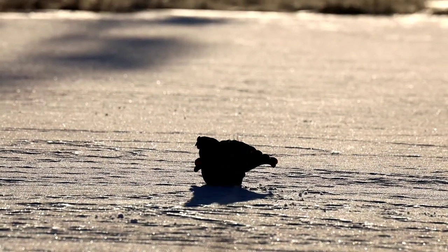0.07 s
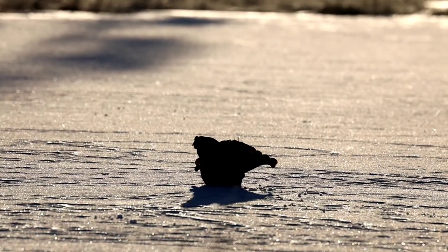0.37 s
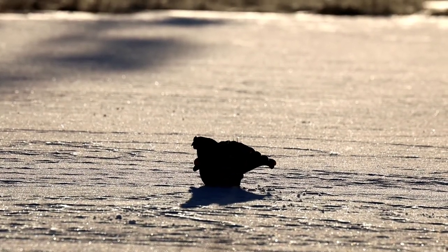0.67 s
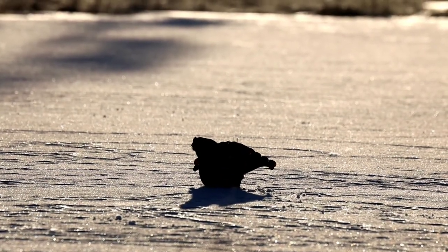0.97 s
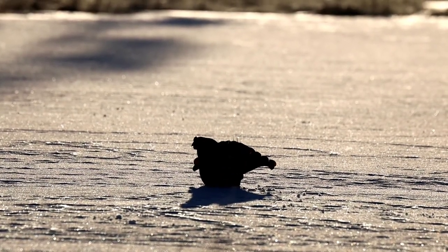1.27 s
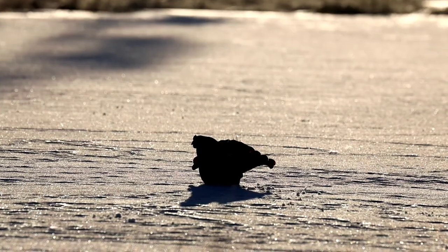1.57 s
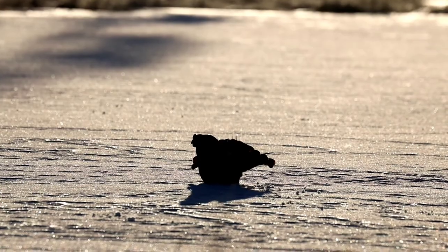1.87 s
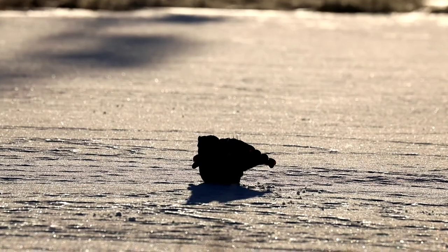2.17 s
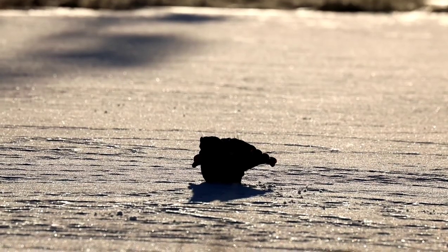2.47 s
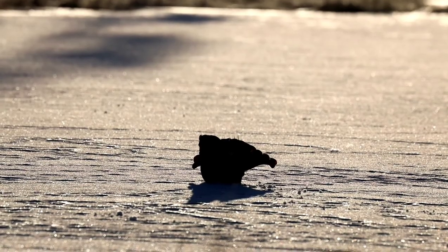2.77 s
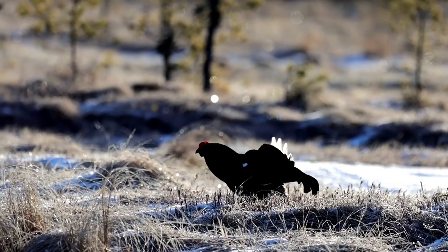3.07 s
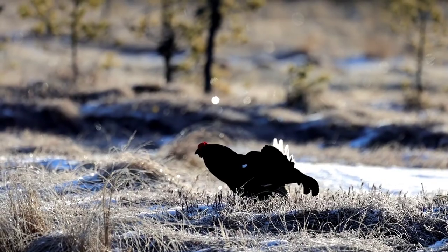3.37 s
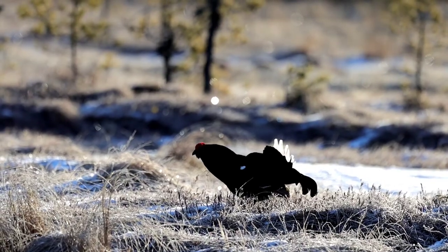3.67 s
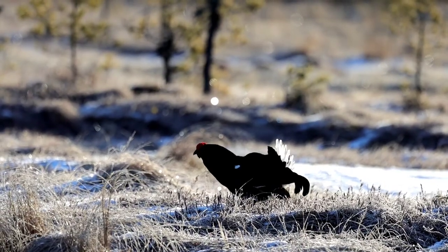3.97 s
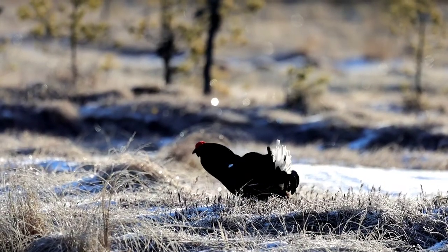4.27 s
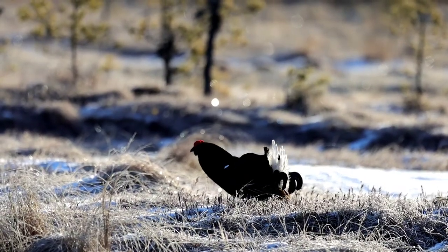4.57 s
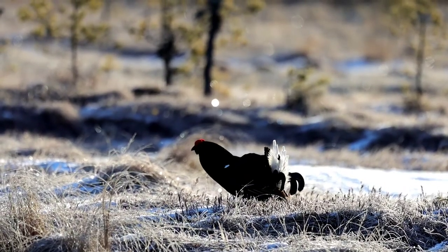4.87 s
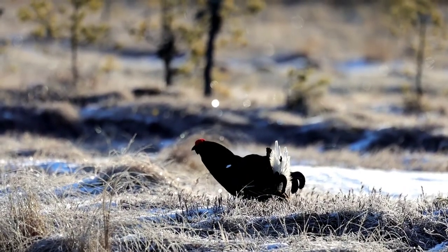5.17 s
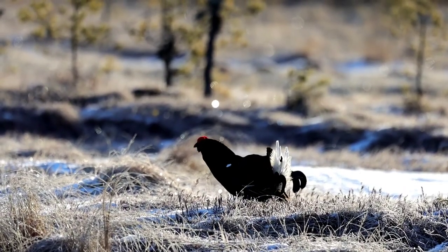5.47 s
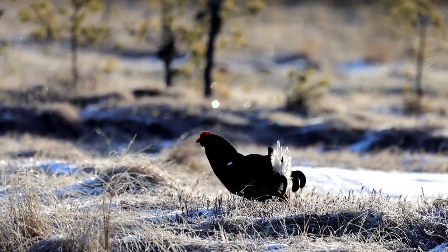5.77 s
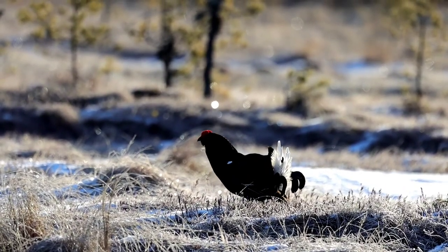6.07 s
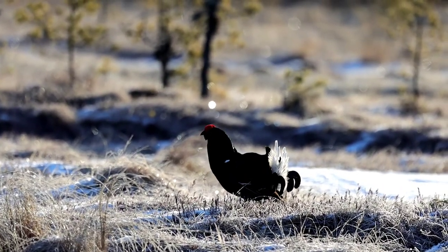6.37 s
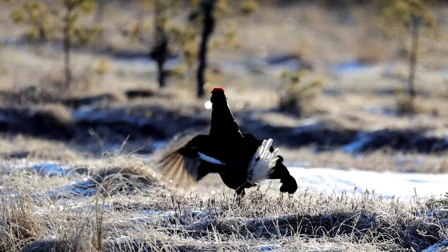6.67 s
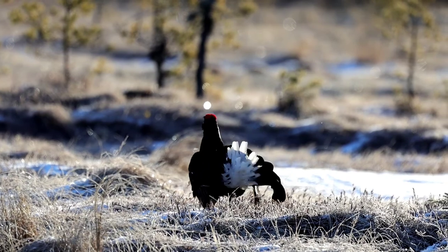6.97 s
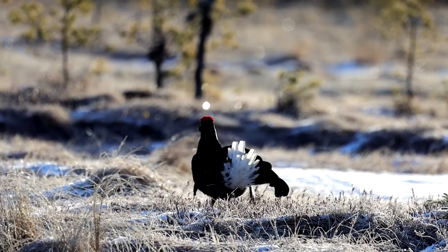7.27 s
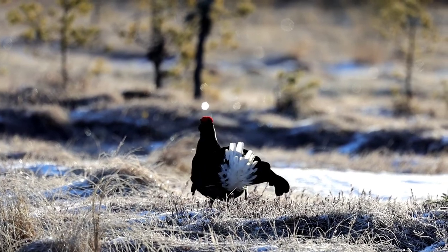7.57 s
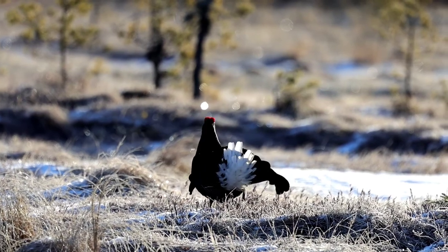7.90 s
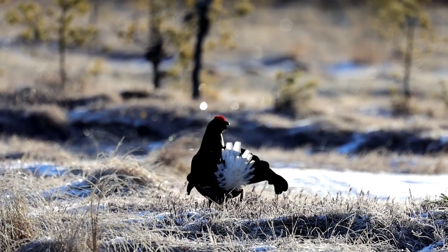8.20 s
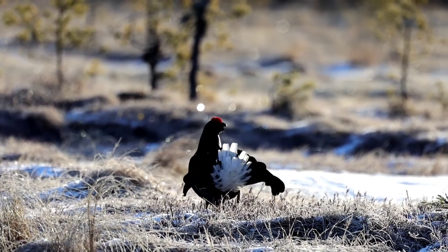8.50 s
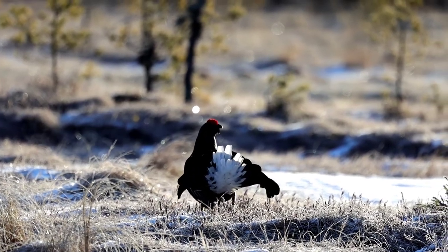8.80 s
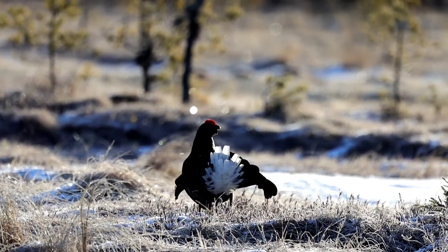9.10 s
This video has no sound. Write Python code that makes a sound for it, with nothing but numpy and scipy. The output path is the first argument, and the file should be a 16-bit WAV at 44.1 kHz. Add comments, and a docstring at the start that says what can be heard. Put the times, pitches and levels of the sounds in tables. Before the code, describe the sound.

A black grouse bubbles and coos outdoors, then flutters its wings and gives a harsh hiss, with faint small birds behind.

```python
"""A black grouse cock bubbling on a frozen bog, on a pair of microphones. His short, pure coos glide
through the resonance of his swollen throat sac; near the end he jumps with a flutter and gives a harsh
two-part hiss. Further off, rivals coo and hiss, and small birds chip, whistle and twitter. For three
seconds we stand by crackling ice, the air almost mono; then out on the bog, the air quieter and wide."""
import sys
import numpy as np
from scipy import signal
from scipy.fft import rfft, irfft, next_fast_len
from scipy.io import wavfile
from scipy.ndimage import uniform_filter1d

SR = 44100
rng = np.random.default_rng(int(sys.argv[2]) if len(sys.argv) > 2 else 0)


def waveform_to_disk(signal):
    """Save audio, clipped to [-1, 1], as 16-bit WAV at the path in sys.argv[1]."""
    frames = np.transpose(np.atleast_2d(signal))
    scaled = np.clip(frames, -1, 1) * 32767
    samples = np.round(scaled).astype(np.int16)
    wavfile.write(sys.argv[1], SR, samples)


N = 411894
TIME = np.arange(N) / SR
SAC_HZ, SAC_WIDTH_HZ = 545, 66  # resonance of the throat sac


def grouse_coos():
    """The near cock's even runs and hooked coos, then fainter ones, some from far rivals."""
    # runs: t/s, coos, period/s, first top/Hz, last top/Hz, lateness of the pitch change (power),
    # first drive/dB, last drive/dB
    runs = [(0.5553, 6, .0721, 467, 538.6, 0.54, -28.5, -22.8),
            (1.2058, 11, .0719, 511, 656, 2.72, -25.4, -19.5), (3.1296, 5, 0.071, 522, 562, 4, -33, -31),
            (5.3777, 3, .0712, 460, 498, 0.55, -34.5, -42), (7.5704, 4, 0.075, 539, 624, 1.3, -46, -43.5),
            (8.618, 3, .071, 506, 489.6, 1, -36, -49)]
    # hooked coos: t/s, length/s, top/Hz, rise/Hz, crest (share of length), drive/dB
    hooks = [(0.044, 0.02, 613, 37, 0.2, -19.5), (0.116, 0.062, 623, 10, 0.7, -18.5),
             (0.198, 0.055, 593, 158, 0.66, -23.5), (0.243, 0.082, 664, 148, 0.45, -25.5),
             (0.494, 0.042, 618, 10, 0.068, -26), (0.989, 0.025, 523, -2, 0.36, -25.5),
             (1.144, 0.042, 582, 5, 0.02, -25), (1.99, 0.06, 698, 163, 0.26, -20),
             (2.065, 0.042, 705, 208, 0.18, -20), (2.257, 0.031, 689, 132, 0.27, -34),
             (2.321, 0.074, 642, 52, 0.46, -22), (2.459, 0.029, 672, 152, 0.28, -18.5),
             (2.567, 0.07, 678, 254, 0.49, -20), (2.651, 0.066, 562, 84, 0.51, -22.5),
             (2.729, 0.056, 655, 260, 0.67, -20), (2.781, 0.13, 676, 88, 0.46, -20),
             (2.997, 0.021, 574, 29, 0.56, -20), (3.017, 0.06, 533, 20, 0.5, -29.5),
             (3.5, 0.052, 587, 36, 0.28, -25), (3.571, 0.044, 621, 28, 0.59, -23),
             (3.643, 0.035, 637, 49, 0.51, -23.5), (3.915, 0.066, 629, 92, 0.47, -27),
             (4.051, 0.026, 638, 76, 0.49, -22.5), (4.149, 0.071, 622, 212, 0.67, -28),
             (4.244, 0.063, 511, 18, 0.54, -27.5), (4.325, 0.067, 643.5, 242, 0.61, -27.5),
             (4.365, 0.13, 612, 59.5, 0.66, -31), (4.583, 0.069, 518, 0, 0.23, -35),
             (4.673, 0.059, 667, 262, 0.52, -26.5), (4.778, 0.018, 605, 47, 0.51, -25),
             (4.852, 0.066, 569, -2, 0.39, -30), (4.913, 0.072, 554, 189, 0.73, -31.5),
             (4.993, 0.065, 656, 146, 0.42, -27.5), (5.079, 0.068, 559, 50, 0.47, -43.5),
             (5.168, 0.05, 600, 50, 0.45, -43.5), (5.243, 0.046, 576, 5, 0.033, -31.5),
             (5.292, 0.048, 561, 50, 0.22, -43.5), (5.785, 0.033, 512, 36, 0.57, -40),
             (5.834, 0.093, 460, 14, 0.61, -33), (5.882, 0.073, 495, 46, 0.37, -37),
             (6.291, 0.029, 585, 30, 0.37, -45), (6.337, 0.0255, 620, 30, 0.4, -45.5),
             (6.397, 0.023, 595, 20, 0.22, -48), (6.472, 0.063, 610, 65, 0.46, -45.5),
             (6.568, 0.05, 624, 30, 0.085, -32.5), (6.657, 0.029, 607, 103, 0.14, -42.5),
             (6.876, 0.059, 545, 12, 0.32, -44), (7.874, 0.057, 612, 214, 0.23, -43.5),
             (8.238, 0.034, 600, 63, 0.088, -45), (8.484, 0.029, 590, 88, 0.16, -43),
             (8.527, 0.078, 520, 55, 0.47, -39.5), (8.748, 0.045, 519, 140, 0.61, -45),
             (8.994, 0.041, 586, 1, 0.01, -44), (9.05, 0.076, 508, 5, 0.55, -43),
             (9.204, 0.072, 562, 60, 0.45, -46), (9.303, 0.029, 604, 50, 0.3, -39)]
    out = np.zeros(N)
    for start, count, period, first_hz, last_hz, lateness, first_db, last_db in runs:
        for k, progress in enumerate(np.linspace(0, 1, count)):
            top_hz = first_hz + (last_hz - first_hz) * progress ** lateness
            db = first_db + (last_db - first_db) * progress
            add(out, start + k * period, run_coo(.058, top_hz, db))
    for start, *hook in hooks:
        add(out, start, coo(*hook, fall=.317))
    return out


def run_coo(length, top_hz, db, sac_width_hz=SAC_WIDTH_HZ):
    """One coo of a run: a low one just falls; pushed above 468 Hz, it arches more and more."""
    crest = np.clip((top_hz - 468) / 570, 0, .5)
    return coo(length, top_hz, 110 * crest, crest, db, fall=.203, sac_width_hz=sac_width_hz)


def coo(length, top_hz, rise_hz, crest, db, fall, sac_width_hz=SAC_WIDTH_HZ):
    """A near-pure tone that crests, then loses the share `fall` of its pitch; loudest near the sac's."""
    attack_s, release_s, swell_db = .00663, .0082, 6.5
    t = np.arange(int(length * SR)) / SR
    progress, crest = t / length, np.clip(crest, .01, .9)
    before = np.maximum(1 - progress / crest, 0)
    after = np.maximum((progress - crest) / (1 - crest), 0)
    hz = top_hz - rise_hz * before ** 1.38 - fall * top_hz * after ** (1 + 2.74 * crest)
    detune = (hz / SAC_HZ - SAC_HZ / hz) * SAC_HZ / sac_width_hz
    gate = np.clip(t / attack_s, 0, 1) * np.clip((length - t) / release_s, 0, 1)
    drive = gate * undb(db + swell_db * (progress - .5)) * (1 + .05 * walk(200, len(t)))
    phase = 2 * np.pi * np.cumsum(hz) / SR
    tone = np.sin(phase) + undb(-52) * np.sin(2 * phase)
    return np.sqrt(2) * drive / np.hypot(1, detune) * tone


def hiss(main_width_hz=200):
    """The cock forces rasping air through one gliding resonance and the steady ones of his windpipe."""
    # a short syllable, then a long one: t/s, level/dB, main resonance/Hz
    syllables = [(6.825, -71, 1446), (6.84, -47.5, 1388), (6.875, -38.5, 1352), (6.94, -46, 1288),
                 (7.05, -59.5, 1248), (7.2, -50, 1271), (7.42, -44.5, 1354), (7.55, -46, 1360),
                 (7.67, -55.5, 1586), (7.735, -78, 1600)]
    # windpipe resonances: f/Hz, width/Hz, spectral level against the main one/dB
    windpipe = [(1246, 120, -6.5), (1590, 210, -4), (2170, 660, -20), (3600, 990, -28), (6800, 1700, -29)]
    jet = rng.standard_normal(N) * np.exp(.04 * walk(130))
    centre_hz = uniform_filter1d(curve(syllables, column=2), SR // 20)
    band = signal.sosfilt(signal.butter(3, main_width_hz / 2, fs=SR, output="sos"), jet)
    rasp = unit(band * np.cos(2 * np.pi * np.cumsum(centre_hz) / SR))
    for hz, width_hz, db in windpipe:
        rasp += undb(db) * np.sqrt(width_hz / main_width_hz) * unit(resonate(jet, hz, width_hz))
    blowing = (TIME > syllables[0][0]) & (TIME < syllables[-1][0])
    gate = uniform_filter1d(blowing.astype(float), SR // 100)
    return unit(rasp) * gate * undb(curve(syllables))


def rivals():
    """Two cocks across the bog: one bubbles evenly, the other in higher, clipped notes."""
    # both together at the microphones: t/s, level/dB
    levels = [(0, -45), (1.1, -50.5), (2.2, -53.5), (2.8, -49), (3.1, -40.5), (3.5, -48.5), (4.6, -50),
              (5.2, -55), (6.1, -51.5), (6.4, -56.5), (6.75, -57), (7.3, -52.5), (7.7, -54.5),
              (8.35, -54.5), (8.7, -54.5), (9, -48.5), (9.34, -49)]
    # the clipped rival against the even one: t/s, level/dB
    balance = [(0, -5), (5.8, -4), (6.05, 6), (6.7, 6), (6.9, -4.5), (9.34, -3)]
    even = rival(period_s=.073, centre_hz=509.8, held_share=.763, looseness=.12, wander_hz=13.5)
    clipped = rival(period_s=.07, centre_hz=591.4, held_share=.42, looseness=.25, wander_hz=28)
    lead = undb(curve(balance))
    return (even + lead * clipped) / np.hypot(1, lead) * undb(curve(levels))


def rival(period_s, centre_hz, held_share, looseness, wander_hz, uneven_db=2):
    """A far cock and his echo: an unbroken run of coos whose pitch wanders."""
    out, drift, offset = np.zeros(N), walk(2.2), rng.random()
    for k, (late, high, loud, held) in enumerate(rng.standard_normal((140, 4))):
        start = (k + offset + looseness * late) * period_s
        hz = centre_hz + wander_hz * (drift[int(np.clip(start * SR, 0, N - 1))] + .5 * high)
        length = period_s * held_share * (1 + .35 * np.tanh(held))
        add(out, start, undb(uneven_db * loud) * unit(run_coo(length, hz, db=0, sac_width_hz=190)))
    return unit(out + undb(-11) * scatter(out, t60=.69))


def far_hisses():
    """Other grouse hiss far off; only their main resonance carries."""
    # hisses: t/s, length/s, level/dB
    calls = [(.2, .25, -53.5), (1.28, 0.24, -59.5), (2.28, 0.34, -56.5)]
    swell = sum(undb(db) * np.sin(np.pi * np.clip((TIME - start) / length, 0, 1))
                for start, length, db in calls)
    return swell * unit(resonate(rng.standard_normal(N), hz=1640, width_hz=570))


def ice_cracks():
    """Single cracks in the ice: a bright snap over a dull push and pull."""
    # cracks: t/s, snap/dB, thud/dB (both before filtering and mixing), decay/s
    cracks = [(0.023, -17, -49, 0.0011), (0.0258, -16, -27, 0.0016), (0.0555, -12, -20.5, 0.0015),
              (0.151, -24, -50, 0.00085), (.1545, -23.5, -51, 0.0034), (0.157, -21.5, -13.5, 0.00058),
              (0.227, -39, -56, .001), (0.568, -44.5, -55, 0.0089), (1.418, -31, -37, 0.0018),
              (1.425, -29, -27, 0.0024), (1.788, -37.5, -50, 0.0016), (2.381, -36, -33.5, 0.0017)]
    # spectra of snap and thud: f/Hz, level/dB
    snap_spectrum = [(250, 6), (800, 10), (1800, 8.5), (2800, -3.5), (4200, 2.5), (7000, -12), (15000, -12)]
    thud_spectrum = [(70, -12), (170, 3.5), (500, 6), (900, -1), (1600, -14), (4000, -45)]
    snaps, thuds = np.zeros((2, N))
    t = np.arange(SR // 20) / SR
    for start, snap_db, thud_db, decay in cracks:
        add(snaps, start, undb(snap_db) * np.exp(-t / decay) * rng.standard_normal(len(t)))
        swing = 2 * t / decay - 2
        add(thuds, start - decay / 2, -undb(thud_db) * swing * np.exp(-swing ** 2))
    return colour(snaps, snap_spectrum) + undb(-5) * colour(thuds, thud_spectrum)


def rustle(grain_db=5):
    """Grainy rustle in fading bursts: frost crunch at the start, wing flutter as the cock jumps."""
    # bursts: t/s, attack/s, level/dB, fading/(dB/s)
    bursts = [(0, 0.0024, -30, 92), (.2, 0.068, -55, 30), (6.82, .05, -62, 66)]
    # spectrum of the grains: f/Hz, level/dB
    spectrum = [(120, 0.5), (600, 0), (1100, -1), (1900, 1), (2900, -2.5), (4300, -4), (6500, -12),
                (15000, -18)]
    grains = rng.standard_normal(N) * undb(grain_db * np.minimum(rng.exponential(size=N), 5))
    envelope = np.zeros(N)
    for start, attack, db, fading in bursts:
        since = TIME - start
        envelope += np.clip(since / attack, 0, 1) * undb(db - fading * np.maximum(since - attack, 0))
    return unit(colour(grains, spectrum)) * envelope


def small_birds():
    """Quick downward chips and gliding whistles, heard direct and off the ground."""
    # one bird's chips: t/s, level at the bird/dB
    chips = [(2.026, -51.5), (2.152, -51), (2.274, -43.5), (2.381, -43), (2.502, -41.5), (2.625, -41),
             (2.749, -42.5), (2.877, -40)]
    # other birds' whistles: t/s, length/s, start/Hz, end/Hz, level at the bird/dB
    whistles = [(3.032, .036, 2940, 4300, -50), (3.784, 0.2, 4830, 3900, -62.5),
                (5.053, 0.2, 5020, 3920, -56.5), (5.537, 0.12, 2060, 1850, -70),
                (5.857, 0.091, 2030, 1860, -69.5), (5.948, .08, 1880, 2080, -73),
                (6.664, .42, 4810, 3260, -65.5), (8.903, 0.19, 4630, 4000, -69),
                (9.121, .1, 3870, 3540, -66)]
    direct = np.zeros(N)
    for start, db in chips:
        add(direct, start, glide(.027, start_hz=4370, end_hz=2510, db=db))
    for start, *whistle in whistles:
        add(direct, start, glide(*whistle))
    # the ground bounce arrives just behind and hollows the glides near 3.1 kHz
    return .55 * direct + .45 * np.roll(direct, 21)


def glide(length, start_hz, end_hz, db, waver=.0067, flutter_db=2):
    """A small bird's pure note that slides evenly, wavering a little."""
    size = int(length * SR)
    hz = np.geomspace(start_hz, end_hz, size) * (1 + waver * walk(82.5, size))
    shape = np.sin(np.pi * np.linspace(0, 1, size) ** .8)
    envelope = shape * undb(db + flutter_db * walk(61, size))
    return np.sqrt(2) * envelope * np.sin(2 * np.pi * np.cumsum(hz) / SR)


def twitter(start_s=4.268, period_s=.1525, ramp_s=.046):
    """A far songbird's even string of eight buzzy notes, loudest in the middle."""
    envelope = np.zeros(N)
    for k, off_middle in enumerate(np.linspace(-1, 1, 8)):
        since = TIME - start_s - k * period_s
        envelope += undb(-65 - 7 * off_middle ** 2) * np.maximum(1 - np.abs(since) / ramp_s, 0)
    return envelope * unit(resonate(rng.standard_normal(N), hz=3250, width_hz=600))


def open_air(on_bog):
    """The air bed: almost mono over the ice, wide over the bog."""
    # spectra of the air in each place: f/Hz, level/dB
    ice_spectrum = [(25, -22), (60, -3), (170, 0.5), (330, 0), (700, 0), (1100, -8.5), (1650, -10),
                    (2100, -14.5), (3200, -13.5), (4000, -18.5), (4900, -16), (5700, -22.5), (9000, -24),
                    (15500, -27.5)]
    bog_spectrum = [(25, -21), (60, -10), (140, -1), (260, -4), (400, -1), (700, -3), (1100, -11.5),
                    (1600, -12.5), (2100, -17), (3200, -15.5), (4000, -19), (4900, -16.5), (5700, -23),
                    (9000, -24), (15500, -27.5)]
    # loudness of the air: t/s, level/dB
    levels = [(0, -52), (2.15, -48), (3.0, -46.5), (3.15, -59), (9.34, -59.5)]
    bed = (1 - on_bog) * air(ice_spectrum, side_db=-37) + on_bog * air(bog_spectrum, side_db=.5)
    return bed * undb(curve(levels))


def air(spectrum, side_db, stir_db=1.26):
    """Far-off rumble that stirs slowly, under an even, wider hiss; built as mid and side."""
    mid, side = (colour(rng.standard_normal(N), spectrum) for _ in range(2))
    lows = signal.butter(1, 1000, fs=SR, output="sos")
    mid = mid + signal.sosfilt(lows, mid) * (undb(stir_db * walk(6)) - 1)
    side = side - .5 * signal.sosfilt(lows, side)
    return mid + undb(side_db) * np.array([side, -side])


def whine():
    """A faint, steady high tone and its octave."""
    # partials: f/Hz, level/dB
    partials = [(2444, -78), (4888, -84.5)]
    return sum(np.sqrt(2) * undb(db + .5 * walk(1.5)) * np.sin(2 * np.pi * hz * TIME)
               for hz, db in partials)


def scatter(x, t60):
    """Diffuse echo from trees and hummocks, dying by 60 dB in t60 seconds."""
    t = np.arange(SR // 2) / SR
    tail = rng.standard_normal(len(t)) * undb(-60 * t / t60) * np.clip(t / .03, 0, 1)
    return signal.oaconvolve(x, tail / np.linalg.norm(tail))[:N]


def place(x, pan_db, lag):
    """Two microphones: pan is left minus right, lag the samples by which the left hears it later."""
    at = np.arange(N)
    left = np.interp(at - lag / 2, at, x) * undb(pan_db / 2)
    right = np.interp(at + lag / 2, at, x) * undb(-pan_db / 2)
    return np.array([left, right])


def resonate(x, hz, width_hz):
    """A resonance applied twice, for steep skirts."""
    b, a = signal.iirpeak(hz, hz / width_hz, SR)
    return signal.lfilter(b, a, signal.lfilter(b, a, x))


def colour(x, spectrum):
    """Filter by a spectrum that falls away below its first point; white noise keeps its power."""
    size = next_fast_len(len(x))
    hz, db = np.transpose(spectrum)
    bins = np.arange(size // 2 + 1) * SR / size + 1
    gain = undb(np.interp(np.log(bins), np.log(hz), db)) * np.minimum(bins / hz[0], 1)
    return irfft(rfft(x, size) * unit(gain), size)[:len(x)]


def walk(rate_hz, size=N):
    """Smooth random drift with a spread near 1."""
    at = np.arange(size) * rate_hz / SR
    knots = rng.standard_normal(int(at[-1]) + 2)
    return 1.2 * np.interp(at, np.arange(len(knots)), knots)


def curve(rows, column=1):
    """One column of a table, joined by straight lines in time."""
    rows = np.array(rows)
    return np.interp(TIME, rows[:, 0], rows[:, column])


def add(out, start_s, x):
    """Mix x into out from start_s on."""
    i = max(int(start_s * SR), 0)
    out[i:i + len(x)] += x[:max(N - i, 0)]


def undb(db):
    """Decibels to gain."""
    return np.exp(np.asarray(db) * np.log(10) / 20)


def unit(x):
    """Scale to rms 1."""
    return x / np.sqrt(np.mean(x ** 2))


def scene(move_s=3.07):
    """Everything at the microphones: first by the ice, from move_s on the bog."""
    on_bog = np.clip((TIME - move_s) / .1 + .5, 0, 1)
    song = grouse_coos()
    song += undb(-26) * scatter(song, t60=.4)
    grouse = place(song + rivals(), pan_db=.6 - 2.3 * on_bog, lag=2 * on_bog)
    call = hiss()
    call = place(call + undb(-18) * scatter(call, t60=.3), pan_db=-1.7, lag=2)
    birds = small_birds() + twitter()
    birds = place(birds + undb(-10.5) * scatter(birds, t60=.066), pan_db=.5 - 1.3 * on_bog, lag=0)
    background = open_air(on_bog) + whine()
    return grouse + call + far_hisses() + birds + rustle() + ice_cracks() + background


def record(dry, top_hz=15600):
    """The recorder cuts the top steeply."""
    return signal.sosfilt(signal.ellip(10, .1, 90, top_hz, fs=SR, output="sos"), dry)


dry = scene()
out = record(dry)
waveform_to_disk(out)
```